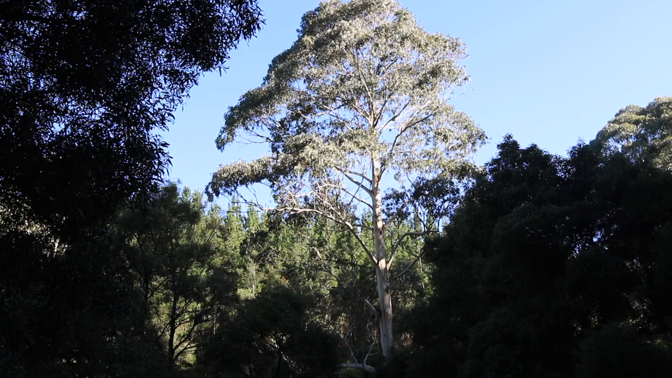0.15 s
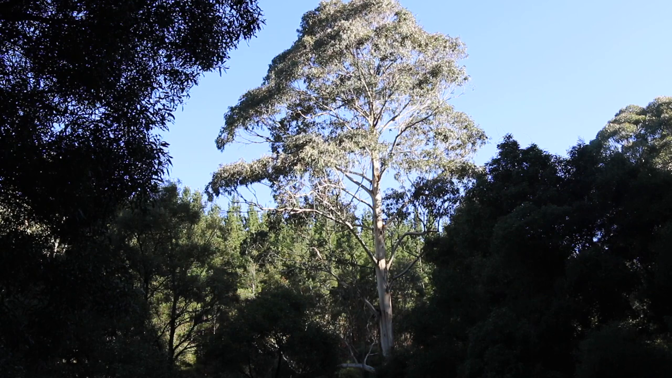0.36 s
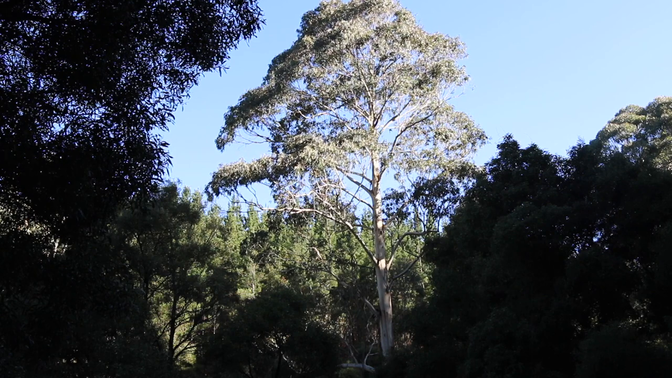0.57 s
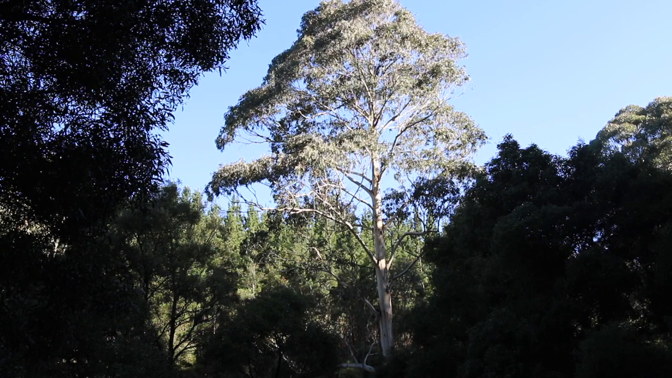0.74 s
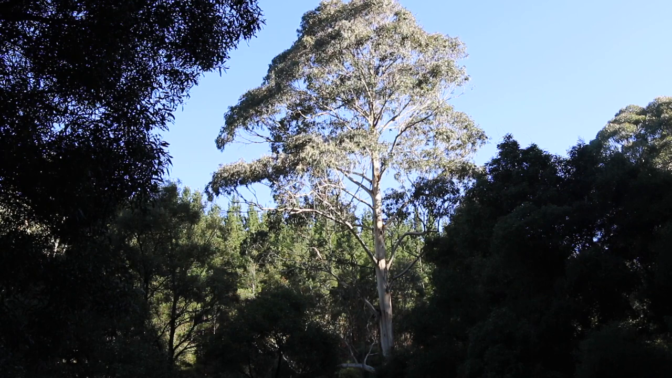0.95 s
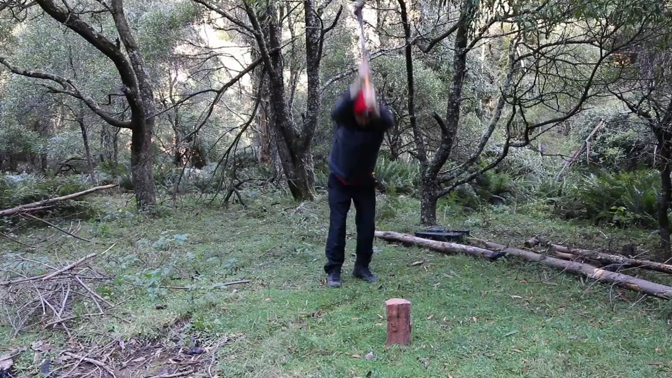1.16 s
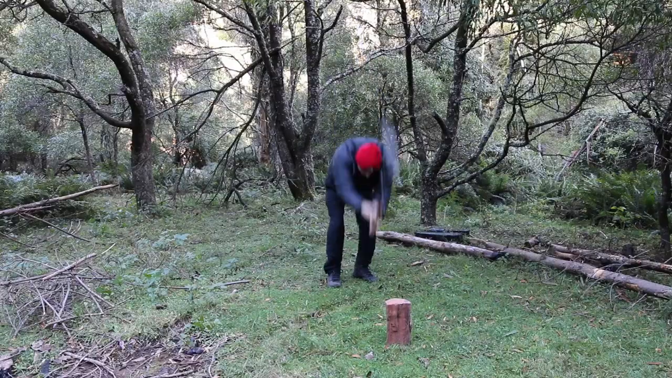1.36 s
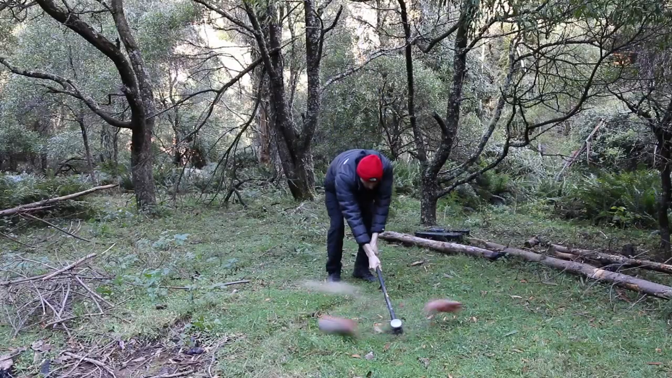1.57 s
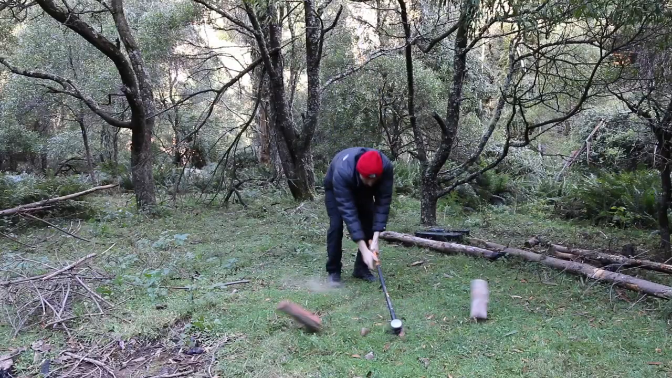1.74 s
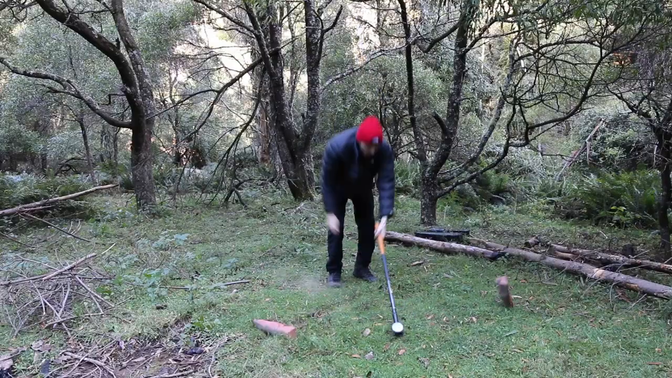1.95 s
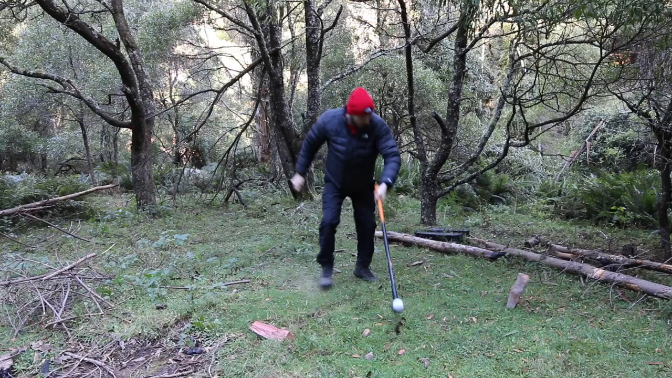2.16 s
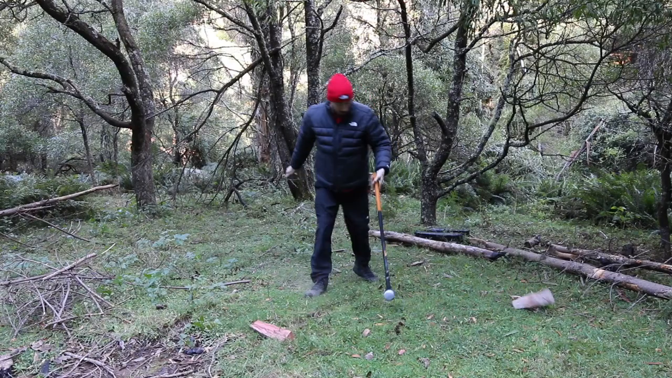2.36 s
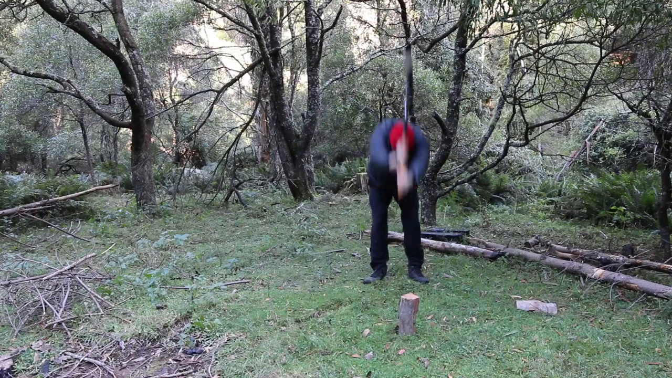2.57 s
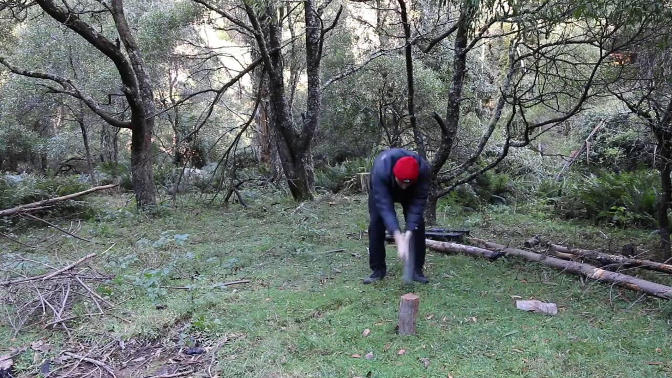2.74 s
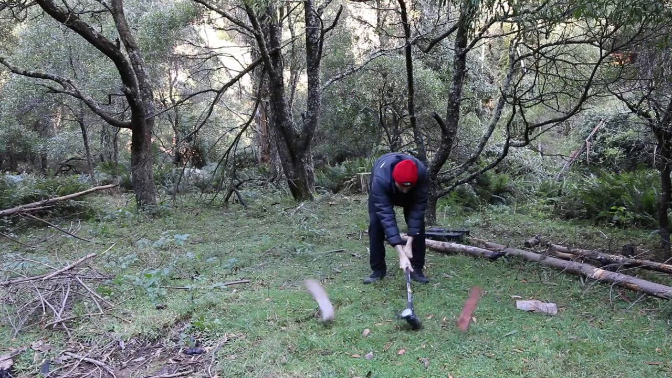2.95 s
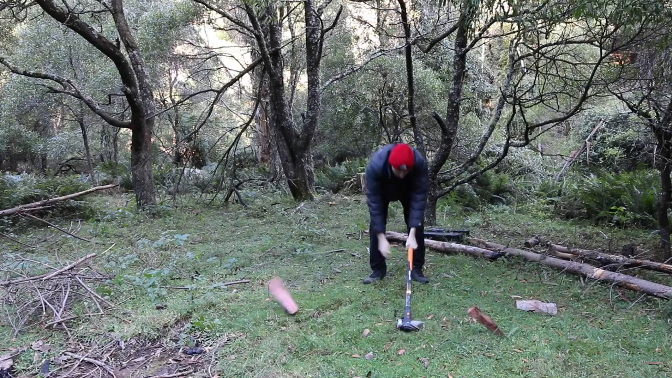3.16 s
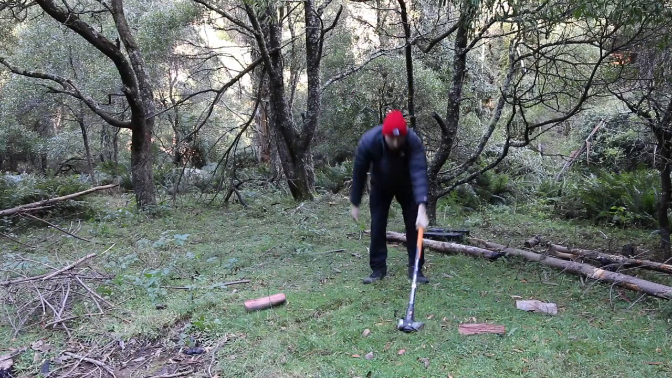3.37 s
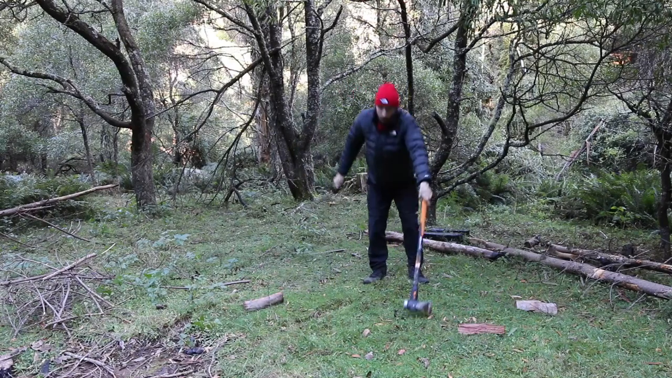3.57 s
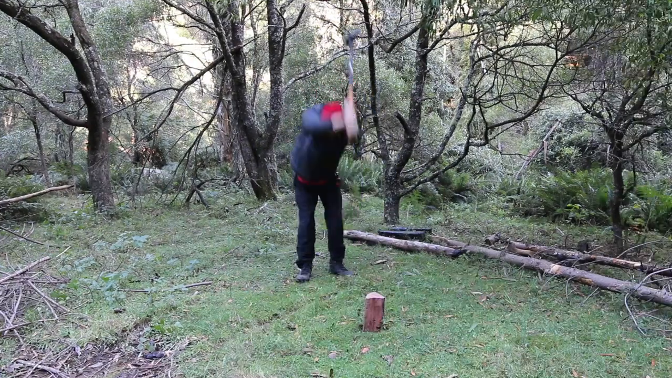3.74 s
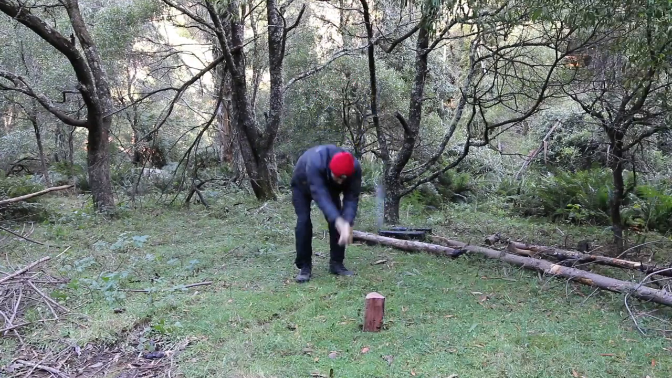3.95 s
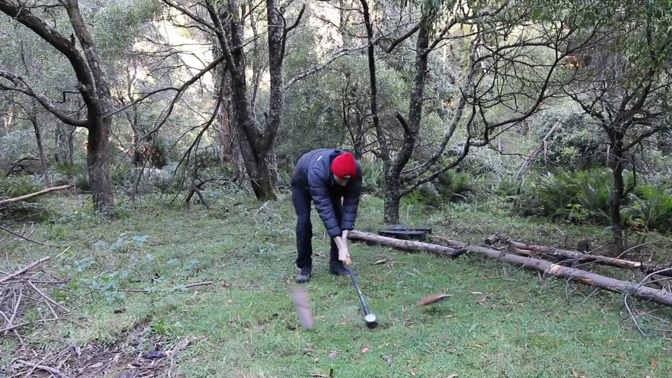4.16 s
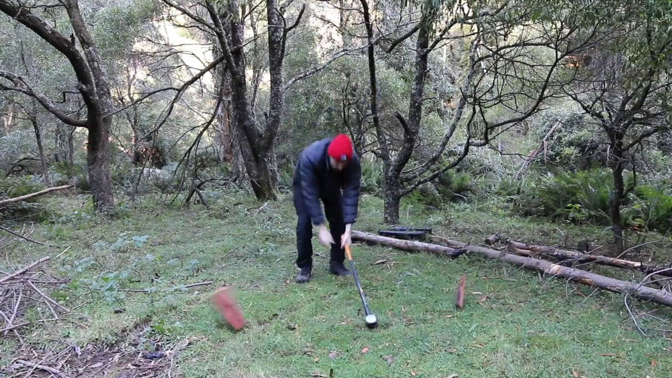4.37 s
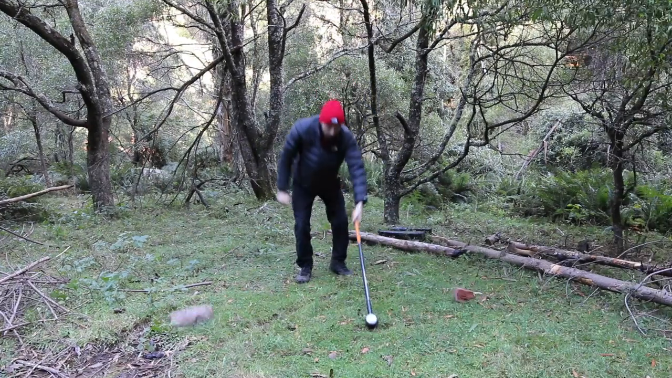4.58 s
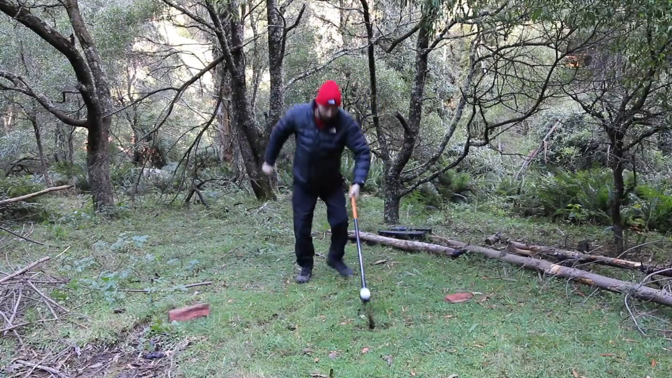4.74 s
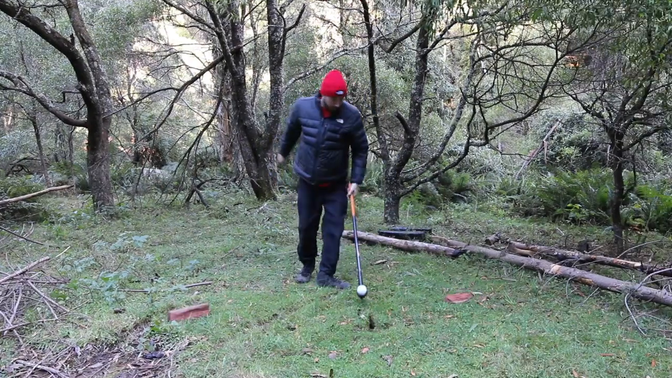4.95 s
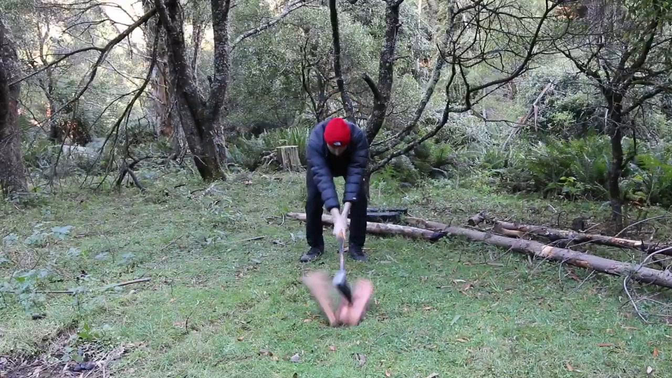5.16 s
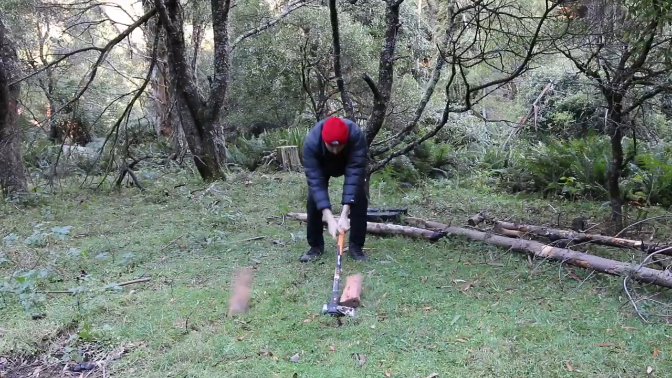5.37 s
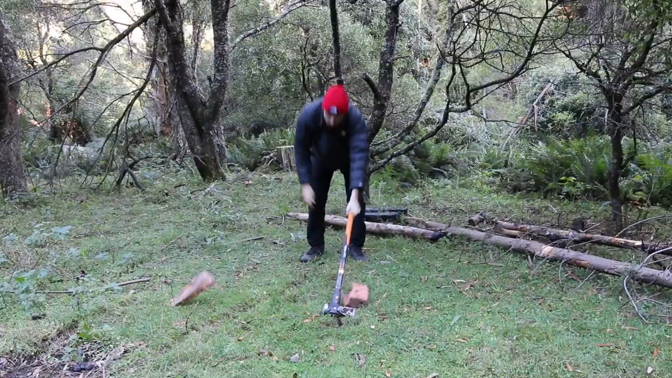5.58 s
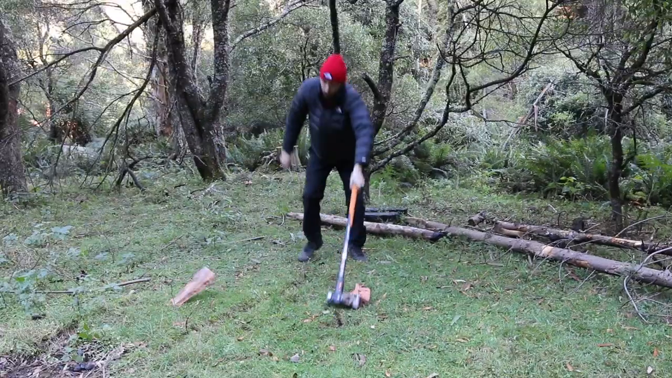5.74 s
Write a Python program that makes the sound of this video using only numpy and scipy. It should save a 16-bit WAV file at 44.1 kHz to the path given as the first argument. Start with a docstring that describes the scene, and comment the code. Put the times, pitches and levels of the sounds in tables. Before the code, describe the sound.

An axe splits four logs with sharp, echoing cracks in a quiet forest, the pieces knocking and thudding onto grass.

```python
"""A forest clearing: a far bird calls over soft air and a faint hum; after a second the air grows louder
and an echo-like wash near 2 kHz cuts in. Then a heavy axe splits four logs on grass, each in one blow:
the wood fractures loudly enough to overload the microphone, the axe rings and the last fibres tear.
After each crack the pieces knock together and thud on the turf, and the trunks scatter the sound back
as a long tail. Between the blows grass and cloth rustle and faint ringing tones fade."""
import sys
import numpy as np
from scipy import signal
from scipy.fft import rfft, irfft, next_fast_len
from scipy.io import wavfile

SR = 44100
rng = np.random.default_rng(int(sys.argv[2]) if len(sys.argv) > 2 else 0)


def wav_record(signal):
    """Record a signal, one row per channel, as 16-bit PCM in the file named by sys.argv[1]."""
    frames = np.transpose(np.atleast_2d(signal))
    bounded = np.clip(frames, -1, 1)
    # unit amplitude maps onto the largest positive 16-bit level
    quanta = np.round(bounded * 32767).astype(np.int16)
    wavfile.write(sys.argv[1], SR, quanta)


N = 256220
TIME = np.arange(N) / SR

# axe head, billets and boots landing on turf: (time [s], level [dB], pitch [Hz], slap re push [dB])
LANDINGS = [(1.566, -31, 102, 3), (1.646, -30.5, 110, -8), (1.920, -33, 145, -16), (1.946, -37, 137, -12),
            (2.363, -48, 109, -16), (2.505, -26.5, 144.7, -19), (2.914, -35, 97, 0.5),
            (3.307, -24, 113, 4.5), (4.112, -32.5, 108, -9), (4.18, -37, 107, -14), (4.529, -35, 170, -6),
            (4.559, -38.5, 123, -3), (4.714, -40.5, 135, -20), (5.284, -28.5, 125, -12),
            (5.326, -33, 225, -19), (5.601, -33, 122, -4.5)]


def axe_blows(trunks, tear_db=-23.5):
    """Brittle fracture: the log releases its strain in a crack, while the impact rings the axe's modes."""
    # blows: (time [s], crack level [dB], fracture length [s], axe ring level [dB], echo level [dB])
    strokes = [(1.5167, -1, .0011, -15, -10), (2.8295, -3.5, .0014, -15, -7),
               (4.0704, -2.5, 0.000898, -29, -13.5), (5.1972, -2, .0013, -9.5, -11)]
    # crack spectrum that each log radiates ahead: (frequency [Hz], gain [dB])
    spectra_ahead = [
        [(35, -35), (60, -12.5), (149, -5.5), (469, -8), (636, -1.5), (1170, -4.5), (1440, -3.5), (2090, -3),
         (2650, -18.5), (3270, -5.5), (3500, -22), (3760, -10), (4640, -20), (9350, -18), (16000, -38)],
        [(35, -13), (60, -19), (160, -11.5), (566, -6.5), (862, -13), (1660, -4.5), (1820, -4.5), (2050, 1),
         (3190, -16), (4320, -21.5), (5210, -26), (6280, -18), (8120, -25), (14200, -32), (16000, -62)],
        [(35, -89), (60, -39), (268, -18.5), (553, -7), (1110, -9.5), (1440, -2), (2000, -17), (2250, -16),
         (2900, -21), (3190, -15), (3760, -38), (6140, -25), (7230, -40), (14900, -42.5), (16000, -44)],
        [(35, -1), (60, -11.5), (593, -1), (1170, -16), (1660, -4), (2250, -2), (2520, -7), (3190, -7),
         (3420, -16), (3850, -3), (5330, -38), (6900, -7), (7750, -19), (9130, -12), (16000, -32)],
    ]
    # crack spectrum that each log radiates sideways into the trees: (frequency [Hz], gain [dB])
    spectra_sideways = [
        [(88, -45), (150, -9.5), (240, -8), (368, -7), (414, -5.5), (689, -8), (1240, -13.5), (2180, -6),
         (3920, -13), (7040, -24), (14800, -37.5), (16000, -44)],
        [(88, -45), (150, -13), (217, -13), (270, -13), (361, -16.5), (689, -10), (1140, -8.5), (1900, 3.5),
         (2700, -8.5), (3040, -3.5), (3770, -13.5), (4760, -15.5), (7770, -29.5), (16000, -47)],
        [(88, -29), (150, -8), (328, -11), (361, -5.5), (675, -5), (2310, -5.5), (2650, -8.5), (4160, -10),
         (11300, -32.5), (14500, -50), (16000, -67)],
        [(88, -37), (150, -14), (275, -11), (414, -7), (601, -11), (1020, -5.5), (1240, -9.5), (1360, -3),
         (3220, -5), (9260, -23.5), (16000, -36)],
    ]
    # modes of the axe head and handle: (frequency [Hz], level [dB], t60 [s])
    axe_modes = [(684, -4, 0.024), (1930, -6.5, 0.073), (2062, -4.5, 0.048), (2280, 4.5, 0.052),
                 (3223, -5, 0.03), (3850, -33.5, 0.013), (6650, -9, 0.038)]
    out, t = np.zeros((2, N)), seconds(8192)
    for (s, db, length, ring_db, echo_db), ahead, sideways in zip(strokes, spectra_ahead, spectra_sideways):
        ring = sum(from_db(mode_db + rng.normal(0, 1.1)) * mode(t, hz, t60) * rng.choice([-1, 1])
                   for hz, mode_db, t60 in axe_modes)
        add(out, s, from_db(db) * nearby(crack(length, ahead), near_db=-12))
        add(out, s, from_db(ring_db) * nearby(ring, near_db=-20))
        add(out, s, from_db(tear_db) * nearby(tearing(), near_db=-7.5))
        add(out, s, from_db(echo_db) * echo(crack(length, sideways), trunks))
    return out


def crack(length, spectrum):
    """Source and filter: the log colours a fracture, scaled to the energy of 3 ms at rms 1."""
    burst = colour(fracture(length), spectrum)
    return burst / np.sqrt(np.sum(burst ** 2) / (.003 * SR))


def fracture(length, count=32, size=8192):
    """Dispersion: each frequency is let go after its own delay, tearing an impulse into a short burst."""
    hz = np.minimum((np.arange(count) + rng.random(count)) / length, .48 * SR)
    radius = np.exp(-np.pi * .45 / length / SR)
    a1 = -2 * radius * np.cos(2 * np.pi * hz / SR)
    one = np.ones(count)
    allpasses = np.column_stack([radius ** 2 * one, a1, one, one, a1, radius ** 2 * one])
    return signal.sosfilt(allpasses, signal.unit_impulse(size) + 1e-18)


def tearing(decay_s=0.019, snaps_per_s=900, size=4096):
    """Shot noise: the last fibres snap at random, ever more weakly, as the halves part."""
    # spectrum of tearing fibres: (frequency [Hz], gain [dB])
    fibre_spectrum = [(300, -22), (1000, -3.5), (3000, -1), (7000, -7), (11000, -10.5), (16000, -16)]
    snaps = (rng.random(size) < snaps_per_s / SR) * rng.standard_normal(size)
    return rms_one(colour(snaps, fibre_spectrum)) * np.exp(-seconds(size) / decay_s)


def knocks(trunks, pressed_t60_s=0.0038, ring_doubles_db=10, overtone_damping=0.54, echo_db=-14):
    """Contact damping: a hard knock presses a billet's modes dead, a light one lets them ring."""
    # wood against steel or wood: (time [s], level [dB], pitch [Hz], snap re body [dB])
    contacts = [(1.561, -15.5, 425, 4), (2.715, -33.5, 575, -9), (2.8682, 2, 1820, -5),
                (3.199, -32, 890, -12), (4.0995, -9.5, 920, 4.5), (4.525, -28.5, 730, -4.5),
                (4.564, -37.5, 743, -17), (4.592, -32.5, 733, -24), (4.606, -35, 753, -22),
                (4.74, -58, 907, 14), (5.2072, -13, 2120, 3.5), (5.2633, -8.5, 720, -14),
                (5.304, -10.5, 697, -16), (5.371, -33, 3560, 7), (5.637, -36, 740, -22),
                (5.648, -33, 706, -22), (5.706, -47, 1780, 14)]
    # modes of a split piece: (frequency re pitch [ratio], level [dB])
    billet_modes = [(1, 3.5), (1.4, -2), (1.95, -11.5), (2.75, -8.5)]
    # spectrum of breaking splinters: (frequency [Hz], gain [dB])
    splinter_spectrum = [(200, -10), (2000, 6.5), (3200, 1.5), (6500, -2.5), (10000, -12.5), (16000, -36)]
    out, t = np.zeros((2, N)), seconds(4096)
    for s, db, hz, snap_db in contacts:
        t60 = pressed_t60_s * 2 ** (-db / ring_doubles_db)
        ring = sum(from_db(mode_db) * mode(t, hz * ratio, t60 / ratio ** overtone_damping)
                   for ratio, mode_db in billet_modes)
        # a small piece radiates little bass, and a blunt contact excites little treble
        band = signal.butter(2, [0.3 * hz, min(3.1 * hz, SR / 3)], "band", fs=SR, output="sos")
        body = signal.sosfilt(band, ring)
        snap = colour(fracture(0.000908, size=4096), splinter_spectrum)
        knock = from_db(db) * (body / np.abs(body).max() + from_db(snap_db) * snap / np.abs(snap).max())
        add(out, s, nearby(knock, near_db=-6))
        add(out, s, from_db(echo_db) * echo(knock, trunks))
    return out


def thuds(trunks, slap_lead_s=0.00444, slap_ratio=1.98, echo_db=-16):
    """Impact on a compliant surface: a quick slap at first touch, then the deeper push of full weight."""
    out = np.zeros((2, N))
    for s, db, hz, slap_db in LANDINGS:
        slap = from_db(db + slap_db) * turf(slap_ratio * hz)
        push = from_db(db) * turf(hz)
        add(out, s - slap_lead_s, nearby(slap, near_db=-8.5))
        add(out, s, nearby(push, near_db=-9.5))
        add(out, s, from_db(echo_db) * echo(push, trunks))
    return out


def turf(hz, swings=2.1, size=4096):
    """A heavily damped spring: soft turf gives way and rebounds for about two cycles."""
    cycles = hz * seconds(size)
    envelope = np.sin(np.pi * np.minimum(cycles / swings, 1))
    return -envelope * np.sin(2 * np.pi * cycles)


def rustles(grain_db=3, grass_re_thud_db=-16, grass_limit_db=-51, grass_half_s=0.023):
    """Friction noise in short grainy swells: scuffs, cloth, and the grass crushed under every thud."""
    # scuffs through grass and rubs of jacket cloth: (centre time [s], level [dB], half length [s])
    scuffs = [(1.952, -46, 0.0068), (2.1, -57, 0.076), (3.196, -48, 0.026), (3.97, -52, .03),
              (4.314, -49, 0.016), (4.533, -46, 0.0077), (4.807, -55, 0.039), (4.937, -46.5, 0.041)]
    # spectrum of the friction: (frequency [Hz], gain [dB])
    friction_spectrum = [(300, 5), (1000, 4.5), (3000, 1.5), (6000, 0), (10000, 0.5), (16000, -10.5)]
    crushed = [(s + grass_half_s / 2, min(db + grass_re_thud_db, grass_limit_db), grass_half_s)
               for s, db, _, _ in LANDINGS]
    swells = sum(from_db(db) * np.exp(-.5 * ((TIME - s) / half) ** 2) for s, db, half in scuffs + crushed)
    return swells * rms_one(diffuse(friction_spectrum) * from_db(grain_db * drift(650)))


def nearby(sound, near_db, t60=0.12, rise_s=0.0011, size=8192):
    """Early reflections: the ground and things close by add a quick scatter to the direct sound."""
    # spectrum of the scatter: (frequency [Hz], gain [dB])
    spectrum = [(80, 3.6), (600, 2.7), (3000, 1.3), (9000, 1.7)]
    t = seconds(size)
    scatter = diffuse(spectrum, size) * from_db(-60 * t / t60) * (1 - np.exp(-t / rise_s))
    paths = from_db(near_db) * rms_one(scatter) / np.sqrt(size)
    paths[:, 0] += 1   # the direct path
    return echo(sound, paths)


def forest(rise_s=0.0013, size=57344):
    """Multiple scattering: echoes off countless trunks build up, then decay, the treble first."""
    # spectrum of the echoes before they decay: (frequency [Hz], gain [dB])
    echo_spectrum = [(60, 2.5), (250, -10.5), (700, -1.5), (2000, -6), (4000, -2), (8000, 9.5),
                     (15000, 8.5)]
    # reverberation time among the trees: (frequency [Hz], t60 [s])
    decay_times = [(100, 1.94), (500, 1.71), (2000, 1.6), (4000, 1.04), (8000, 0.7), (15000, 0.62)]
    t = seconds(size)
    echoes = diffuse(echo_spectrum, size) * from_db(0.96 * drift(121.7, size))
    hz, when, frames = signal.stft(echoes, SR, nperseg=512)
    decay = from_db(-60 * when / at_hz(decay_times, hz)[:, None])
    tail = signal.istft(frames * decay, SR)[1][:, :size]
    build_up = from_db(np.interp(t, [0, .07, .125], [-6, -5, 0])) * (1 - np.exp(-t / rise_s))
    return rms_one(tail * build_up) / np.sqrt(size)


def echo(sound, paths):
    """Convolution: every path to each channel delivers a delayed copy of the sound."""
    return signal.fftconvolve(sound[None], paths, axes=1)


def bird_and_ringing(trunks, slide_s=0.037, blur=0.65, flutter_db=3, echo_db=-11):
    """Multipath fading: the trees blur one hoarse, falling bird call and later faint ringing tones."""
    # the opening bird call, then fading tones: (time [s], length [s], note [Hz], start above note [Hz],
    # level [dB], fade [dB/s], pitch jitter [ratio])
    notes = [(0.917, .117, 1183, 480, -46, 80, 0.086), (1.028, 0.053, 1256, 0, -55, 60, 0.066),
             (1.19, .31, 1335, -4, -55, 15, .013), (3.735, 0.11, 2455, 195, -51, 57, 0.061),
             (4.579, 0.43, 2740, 0, -60, 13, 0.014), (4.655, .38, 2000, -1, -52.5, 13, 0.0185)]
    tones = np.zeros(N)
    for s, length, note_hz, slide_hz, db, fade_db_per_s, jitter in notes:
        size = int(length * SR)
        t = seconds(size)
        pitch = (note_hz + slide_hz * np.exp(-t / slide_s)) * (1 + jitter * drift(492, size))
        paths = 1 + blur * (drift(219.4, size) + 1j * drift(226, size))
        blurred = np.real(paths * np.exp(2j * np.pi * np.cumsum(pitch) / SR))
        tone = rms_one(blurred * from_db(flutter_db * drift(49, size)))
        envelope = gate(t, length, attack_s=0.019, release_s=0.012) * from_db(db - fade_db_per_s * t)
        add(tones, s, tone * envelope)
    return tones + from_db(echo_db) * echo(tones, trunks)[:, :N]


def air(change_s=1.145, fade_s=0.015):
    """Ambient noise: at the change the background passes, in a quick equal-power fade, from soft air and a hum
    to louder air and a lower hum."""
    # spectrum of the air before the change: (frequency [Hz], gain [dB])
    first_air_spectrum = [(15, -47), (25, -21.5), (301, -15.5), (335, -12.5), (363, -13), (489, -14),
                          (591, -15.5), (695, -15), (887, -16), (1100, -17), (1400, -23), (2610, -23),
                          (16000, -36)]
    # spectrum of the air after the change: (frequency [Hz], gain [dB])
    second_air_spectrum = [(15, -70), (25, -19.5), (130, -12.5), (242, -17), (277, -6.5), (309, -8.5),
                           (451, -12), (754, -12), (1020, -13.5), (1100, -16), (1790, -18), (2910, -21),
                           (16000, -32.5)]
    first_air = from_db(-54) * diffuse(first_air_spectrum) + hum(hz=710.6, db=-60.5)
    second_air = from_db(-51.5) * diffuse(second_air_spectrum) + hum(hz=277, db=-63)
    share = np.clip((TIME - change_s) / fade_s, 0, 1)
    return np.sqrt(1 - share) * first_air + np.sqrt(share) * second_air


def wash(settle_s=0.52, edge_s=0.013):
    """Exponential settling: an echo-like wash near 2 kHz twice cuts in abruptly, sinks and cuts off."""
    # stretches of the wash: (start [s], stop [s], first level [dB], settled level [dB])
    stretches = [(1.14, 3.73, -49.5, -63), (3.73, 5.03, -49, -54)]
    # spectrum of the wash: (frequency [Hz], gain [dB])
    wash_spectrum = [(500, -29), (1200, -6), (1900, 4), (2700, -1.5), (4500, -12.5), (10000, -24),
                     (16000, -49)]
    envelope = np.zeros(N)
    for start, stop, first_db, settled_db in stretches:
        t = seconds(int((stop - start) * SR))
        db = settled_db + (first_db - settled_db) * np.exp(-t / settle_s)
        add(envelope, start, from_db(db) * gate(t, stop - start, edge_s, edge_s))
    return envelope * diffuse(wash_spectrum)


def hum(hz, db, waver_hz=2.34, waver_db=3):
    """Random modulation: a faint tone wavers in pitch and level."""
    phase = 2 * np.pi * np.cumsum(hz + waver_hz * drift(24.62)) / SR
    return from_db(db) * rms_one(np.sin(phase) * from_db(waver_db * drift(21)))


def diffuse(spectrum, size=N):
    """A diffuse field: noise from all sides, alike left and right in the bass, less so above; rms 1."""
    # likeness of left and right: (frequency [Hz], likeness [0 to 1]); values below 0 count as unrelated
    likeness = [(60, 0.93), (150, 0.86), (380, 0.9), (950, 0.71), (2380, 0.17), (5980, -0.51),
                (15000, -0.33)]
    padded = next_fast_len(size, real=True)
    hz = np.fft.rfftfreq(padded, 1 / SR)
    alike = np.clip(at_hz(likeness, hz), 0, .995)
    mid, side = rfft(rng.standard_normal((2, padded)))
    ports = np.sqrt(1 + alike) * mid + np.sqrt(1 - alike) * side * [[1], [-1]]
    return rms_one(irfft(ports * from_db(at_hz(spectrum, hz)), padded)[:, :size])


def mode(t, hz, t60):
    """Free vibration: a struck resonance decays exponentially."""
    return np.sin(2 * np.pi * hz * t) * from_db(-60 * t / t60)


def colour(x, spectrum, size=4096):
    """Causal (minimum-phase) filter with the given spectrum."""
    gain = from_db(at_hz(spectrum, np.fft.rfftfreq(size, 1 / SR)))
    cepstrum = irfft(np.log(gain))
    cepstrum[1:size // 2] *= 2
    cepstrum[size // 2 + 1:] = 0
    return signal.fftconvolve(x, irfft(np.exp(rfft(cepstrum))))[:len(x)]


def drift(per_s, size=N):
    """Random wander: straight lines between Gaussian values of spread 1."""
    return np.interp(seconds(size) * per_s, np.arange(4096), rng.standard_normal(4096))


def gate(t, length, attack_s, release_s):
    """Trapezoidal envelope: rise from t = 0, hold, and fall to nothing at the given length."""
    return np.clip(np.minimum(t / attack_s, (length - t) / release_s), 0, 1)


def from_db(db):
    """Decibels to gain."""
    return 10 ** (np.asarray(db) / 20)


def rms_one(x):
    """Scale to rms 1."""
    return x / np.sqrt(np.mean(x ** 2) + 1e-20)


def at_hz(points, hz):
    """Read a table on a log-frequency axis."""
    f, value = np.transpose(points)
    return np.interp(np.log(np.maximum(hz, 1)), np.log(f), value)


def seconds(size):
    """Time axis of a sound."""
    return np.arange(size) / SR


def add(out, s, sound):
    """Mix a sound in at time s."""
    at = round(s * SR)
    out[..., at:at + sound.shape[-1]] += sound[..., :N - at]


def scene():
    """Superposition: the sources add, and one stand of trees returns their echoes."""
    trunks = forest()
    chopping = axe_blows(trunks) + knocks(trunks) + thuds(trunks) + rustles()
    return chopping + bird_and_ringing(trunks) + air() + wash()


def record(dry, ceiling=1.0, low_cut_hz=32, high_cut_hz=16100):
    """Overload: two slightly unequal microphone ports clip on the cracks; rumble and top are cut."""
    # excess of the right port over the left: (frequency [Hz], level [dB])
    right_excess = [(100, 1.6), (1000, 1.2), (2500, 1.5), (4500, 1.5), (8000, 1.4), (13000, 0.5)]
    # lead of the left port for sound from ahead: (frequency [Hz], phase [rad])
    left_lead = [(1000, 0.077), (2000, -0.054), (3700, -0.83), (5000, -1), (9000, -0.62), (13000, -1.2)]
    hz = np.fft.rfftfreq(N, 1 / SR)
    half_difference = from_db(-at_hz(right_excess, hz) / 2) * np.exp(.5j * at_hz(left_lead, hz))
    ports = irfft(rfft(dry) * [half_difference, 1 / half_difference], N)
    clipped = np.clip(ports, -ceiling, ceiling)
    low_cut = signal.butter(1, low_cut_hz, "high", fs=SR, output="sos")
    high_cut = signal.ellip(10, .1, 70, high_cut_hz, fs=SR, output="sos")
    return signal.sosfilt(high_cut, signal.sosfilt(low_cut, clipped))


dry = scene()
out = record(dry)
wav_record(out)
```